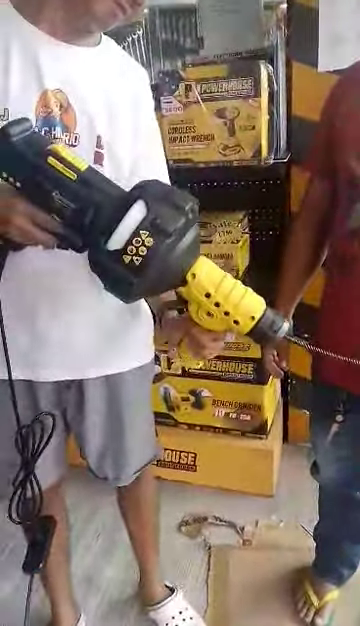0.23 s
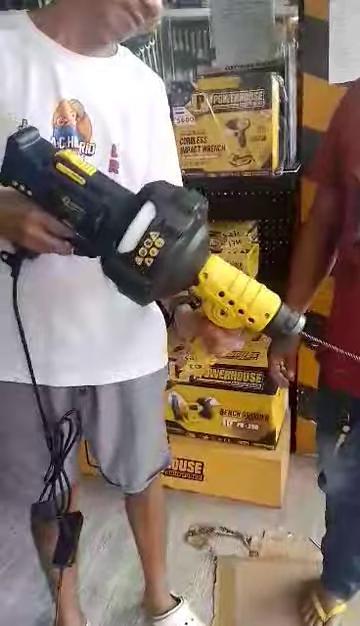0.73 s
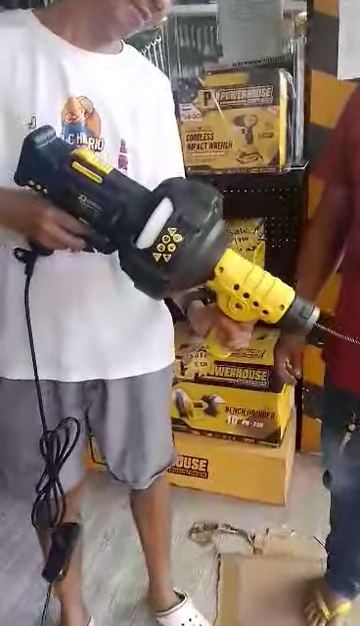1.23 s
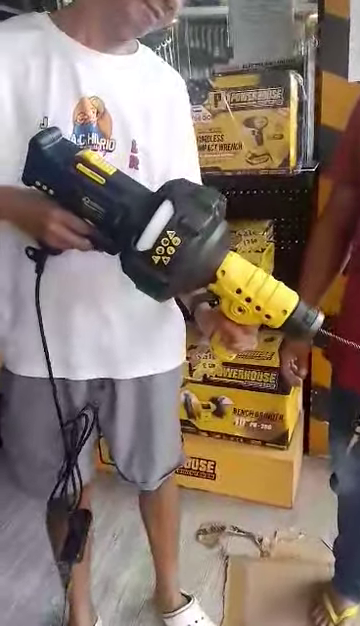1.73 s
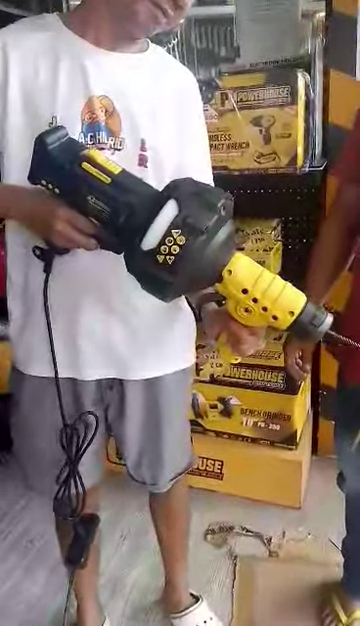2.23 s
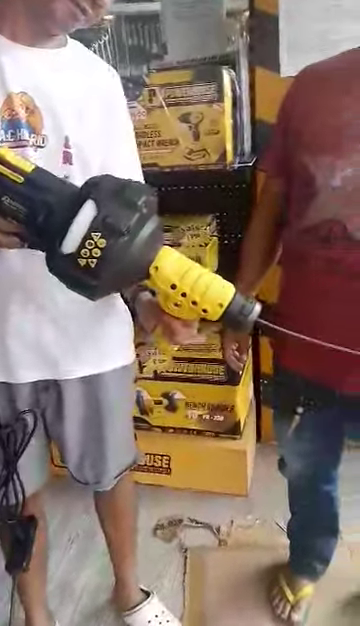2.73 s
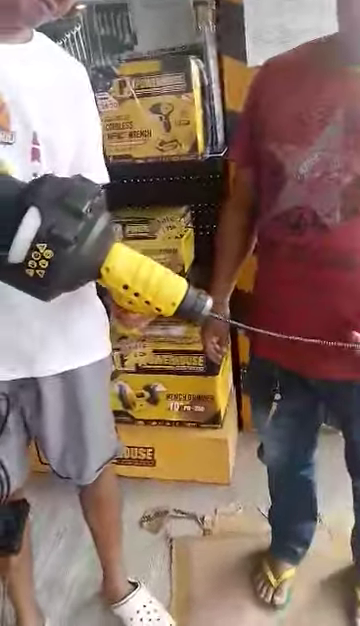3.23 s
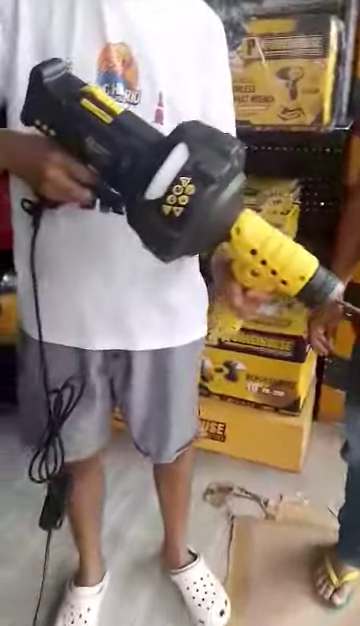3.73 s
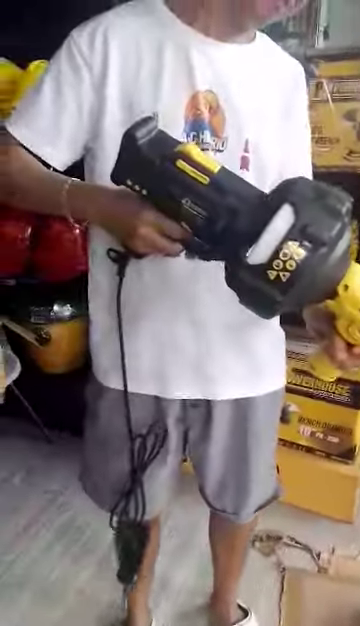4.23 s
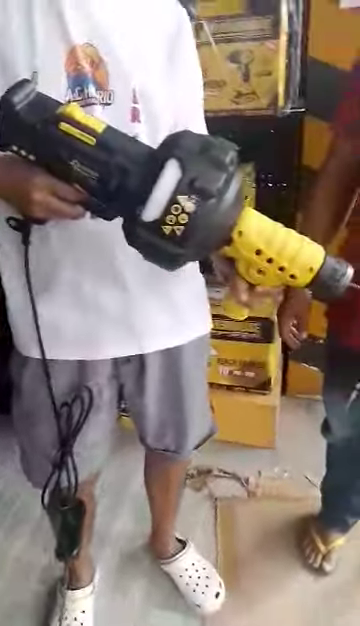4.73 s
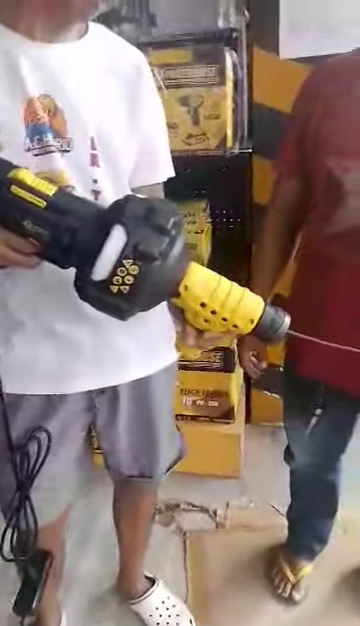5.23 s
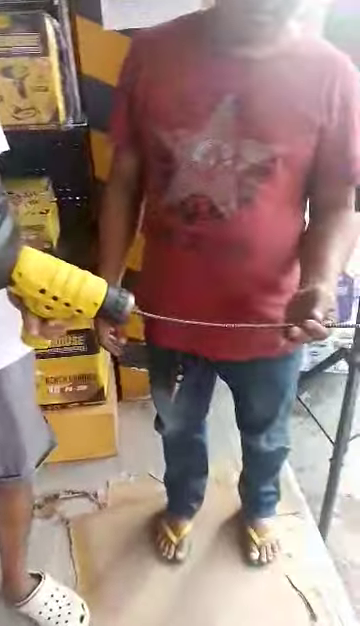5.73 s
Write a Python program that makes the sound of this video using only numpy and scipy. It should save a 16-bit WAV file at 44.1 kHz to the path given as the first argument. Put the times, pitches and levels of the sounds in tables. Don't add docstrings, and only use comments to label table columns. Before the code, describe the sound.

A hand-held electric motor tool whirs up to a high, hissing whine, coasts down briefly, then is switched on again while wind buffets the microphone.

```python
import sys
import numpy as np
from scipy import signal
from scipy.fft import rfft, irfft, dct, next_fast_len
from scipy.io import wavfile
from scipy.ndimage import uniform_filter1d

SR = 44100
rng = np.random.default_rng(int(sys.argv[2]) if len(sys.argv) > 2 else 0)


def dump(signal):
    limited = np.clip(np.atleast_2d(signal).T, -1, 1)
    pcm = np.round(limited * 32767).astype(np.int16)
    wavfile.write(sys.argv[1], SR, pcm)


def makeup_ratio(level_db):
    decades = np.asarray(level_db, float) / 20
    return 10 ** decades


N = 263629
TIME = np.arange(N) / SR

# (power on [s], power off [s], full torque from [s], crawl speed [Hz], top speed [Hz])
PULLS = [
    (.67, 2.57, .69, 20, 330),
    (3.40, 6.2, 3.495, 148, 332.6),
]
# (time [s], nearness [dB], cable drag [dB], aim left minus right [dB])
HANDS = [(.67, -3.5, 2.5, 10), (.79, 0.5, -3, -1.5), (.93, 1.5, -2.5, -4), (1.25, 2, -3, -2),
         (1.65, 1, -1.5, -2), (1.97, 0.5, -2, -0.5), (2.01, 0.5, -1.5, -3.5), (2.06, 0.5, -2, -1),
         (2.57, 1, -2.5, -1.5), (3.12, -4, -4, 1), (3.6, 1.5, -3, -0.5), (3.95, 2, -1, -1),
         (4.01, 1, -4.5, -3), (4.08, 1, -1, -2), (4.56, 1, 1, -2.5), (5.07, 0.5, -1.5, 0),
         (5.62, 1.4, -3, -1.5), (5.98, 1.8, 0, -2.5)]


def evened(x):
    return x / np.sqrt(np.mean(x ** 2, -1, keepdims=True) + 1e-20)


def along(rows):
    s, *columns = np.transpose(rows)
    return np.array([np.interp(TIME, s, c) for c in columns])


def across(rows, hz):
    f, *columns = np.transpose(rows)
    return np.array([np.interp(np.log(hz + 1), np.log(f), c) for c in columns])


def coloured(x, rows, lift_db=0.):
    size = next_fast_len(N)
    gain = makeup_ratio(across(rows, np.fft.rfftfreq(size, 1 / SR)) + lift_db)
    return irfft(rfft(x, size) * gain, size)[:, :N]


def drift(hz):
    r = np.exp(-2 * np.pi * hz * 8 / SR)
    coarse = signal.lfilter([1], np.convolve([1, -r], [1, -r]), rng.standard_normal(N // 8 + 2))
    return np.interp(TIME * SR / 8, np.arange(len(coarse)), evened(coarse)).astype(np.float32)


def whine(turns, multiple, width_hz, steady=.3):
    angle = (2 * np.pi * ((multiple * turns + rng.random()) % 1)).astype(np.float32)
    in_phase = steady * np.sqrt(2) + drift(width_hz)
    return in_phase * np.cos(angle) + drift(width_hz) * np.sin(angle)


def street():
    # (frequency [Hz], left [dB], right [dB])
    street_colour = [(55, -74, -63.5), (114, -60, -45), (168, -48.5, -51), (222, -58, -50.5),
                     (587, -44, -51), (840, -73.5, -74), (1150, -70.5, -68), (1520, -74.5, -75),
                     (2380, -79, -72), (3200, -78.5, -76), (5750, -80.5, -82), (7700, -72, -90),
                     (10900, -91, -72.5), (12800, -92, -84)]
    noise = rng.standard_normal((2, N)) * makeup_ratio(1.2 * drift(5.7))
    quiet = [(f, l - 19 * (f < 800), r - 19 * (f < 800)) for f, l, r in street_colour]
    return coloured(noise, quiet, lift_db=31.5)


def gusts():
    # (start [s], length [s], left [dB], right [dB])
    gust_rows = [(0, 0.45, -36.5, -36), (0.726, 0.56, -48, -34), (1.006, 1.53, -45, -42.5),
                 (1.265, 0.12, -39, -32), (2.163, 0.39, -46, -30.5), (2.488, 0.53, -46, -40.5),
                 (3.087, 0.25, -60, -22.5), (3.23, 0.24, -34.5, -29.5), (3.561, 0.14, -36.5, -30.5),
                 (3.596, 0.57, -43.5, -45.5), (5.197, 0.33, -47.5, -55), (5.771, .3, -43, -22)]
    calm_db, rise_s, fall_s = -44, 0.028, 0.19
    energy = np.full((2, N), makeup_ratio(calm_db) ** 2)
    for s, length, *port_db in gust_rows:
        rise = (TIME - s) / rise_s + 1
        fall = 1 - (TIME - s - length) / fall_s
        shape = np.clip(np.minimum(rise, fall), 0, 1)
        energy += (shape ** 2 * makeup_ratio(port_db)[:, None]) ** 2
    return 10 * np.log10(energy)


def eddies(rush_db):
    per_s, over_rush_db, eddy_hz = 22., 11, 333
    when, size, pitch = rng.random((200, 3)).T
    s = np.cumsum(-np.log(when + 1e-9)) / per_s
    db = np.minimum(np.interp(s, TIME, rush_db) + over_rush_db - 14 * size, -23)
    hz = eddy_hz * (.88 + .4 * pitch ** 3)
    return [row for row in zip(s, db, hz) if row[0] < N / SR]


def puffs(rows):
    out, t = np.zeros(N + 2000), np.arange(-500, 900) / SR
    for (s, db, hz), (phase, length, glide) in zip(rows, rng.random((len(rows), 3))):
        span = (0.0022 + 0.00081 * length) * np.where(t < 0, .8, 1.7)
        angle = 2 * np.pi * (hz * t * (1 + 25 * (glide - .5) * t) + phase)
        wave = np.cos(angle) * np.exp(-abs(t / span) ** 2.74)
        wave += .5 * np.cos(1.82 * angle) * np.exp(-abs(t) / 0.0016)
        wave += 0.098 * np.cos(.3 * angle) * np.exp(-(t / 0.0065) ** 2)
        start = round(s * SR)
        out[start:start + len(t)] += makeup_ratio(db + 2) * wave
    return out[500:N + 500]


def wind():
    # (frequency [Hz], level [dB])
    rush_colour = [(30, -36), (110, -1), (160, -19), (240, 4.5), (330, 3.5), (600, -4), (900, -15.5),
                   (1400, -25), (1800, -46)]
    # (time [s], peak level [dB], frequency [Hz])
    puffs_left = [(0.033, -26, 295), (0.127, -30, 305), (0.183, -32, 360), (0.231, -28, 550),
                  (0.289, -23.5, 350), (0.296, -28.5, 643), (0.38, -23.5, 387), (0.438, -29, 397),
                  (0.518, -32, 315), (1.133, -19, 355), (1.331, -22.5, 510), (1.418, -26, 298),
                  (2.125, -24.5, 292), (3.187, -21, 371), (3.233, -17.5, 431), (3.327, -29, 376),
                  (3.592, -21, 328), (3.658, -20.5, 286), (3.743, -23, 304), (3.805, -25, 319),
                  (4.101, -24, 716), (5.909, -22, 348)]
    puffs_right = [(0.074, -23.5, 388), (0.224, -27, 400), (0.338, -21.5, 340), (0.36, -19.5, 426),
                   (0.513, -24.5, 306), (0.743, -16.5, 293), (0.77, -15, 290), (0.846, -17, 340),
                   (1.001, -17, 303), (1.284, -22, 328), (2.173, -20.5, 325), (2.248, -15, 354),
                   (2.302, -17, 326.5), (2.515, -16, 310), (2.565, -19, 282), (3.09, -16, 400),
                   (3.105, -14.5, 412.6), (3.124, -12, 526), (3.183, -11, 325), (3.222, -15.5, 362),
                   (3.266, -11, 373), (3.291, -16, 322), (3.382, -27, 307), (3.582, -15.5, 317),
                   (3.622, -19, 284), (4.09, -26, 725), (5.77, -18.5, 279), (5.816, -17, 370),
                   (5.876, -15.5, 360), (5.915, -18, 370)]
    lump_db = [4 * drift(27) + 2.3 * drift(5), 4 * drift(34) + 2.2 * drift(6.1)]
    lumps = rng.standard_normal((2, N)) * makeup_ratio(lump_db)
    breeze_db = gusts()
    small = np.array([puffs(eddies(port_db)) for port_db in breeze_db])
    large = np.array([puffs(puffs_left), puffs(puffs_right)])
    breeze_db = breeze_db + 1.4 * np.minimum(breeze_db + 39.5, 0)
    rush = evened(coloured(lumps, rush_colour)) * makeup_ratio(breeze_db - 0.5)
    return rush + small + large


def edge_tones():
    # (time [s], length [s], frequency [Hz], level [dB])
    whistles = [
        (0.064, 0.16, 690, -55),
        (0.235, 0.14, 660, -45),
        (0.363, 0.098, 430, -37),
    ]
    mono = np.zeros(N)
    for s, length, hz, db in whistles:
        swell = np.clip(np.minimum(TIME - s, s + length - TIME) / 0.011, 0, 1)
        mono += makeup_ratio(db) * swell * whine(TIME, hz, 26)
    return mono * makeup_ratio([[0], [-9]])


def trigger():
    on = np.clip(np.minimum(TIME - .575, .69 - TIME) / 0.016, 0, 1)
    song = makeup_ratio(-43.5) * whine(TIME, 7560, 250) + makeup_ratio(-51) * whine(TIME, 9000, 150)
    return on * song * makeup_ratio([[0], [-8]])


def rotor():
    # (time constant [s], shape of the approach [exponent])
    spin_up = [
        (.19, .73),
        (.3, 1),
    ]
    coast_s, engage_s, release_s = 0.99, 0.15, 0.054
    speed, power = np.zeros(N), np.zeros(N)
    for (on, off, torque, crawl_hz, top_hz), (lag, shape) in zip(PULLS, spin_up):
        since = np.maximum(np.minimum(TIME, off) - torque, 0)
        driven = top_hz - (top_hz - crawl_hz) * np.exp(-(since / lag) ** shape)
        coast = np.exp(-np.maximum(TIME - off, 0) / coast_s)
        speed = np.maximum(speed, driven * coast * (TIME > on))
        power += np.clip(np.minimum((TIME - on) / engage_s, 1 - (TIME - off) / release_s), 0, 1)
    return speed + 1, power


def shaft_tones(turns, share, power, pull):
    # (multiple of shaft [ratio], level over hiss [dB], width [Hz])
    mesh = [(3.715, -23.5, 330), (7.594, -18, 79), (11.43, -14.5, 140), (14.98, -12.5, 80),
            (18.75, -17, 240), (22.18, -16, 70), (25.73, -23, 270), (29.54, -18, 140), (32.83, -22.5, 220),
            (37.07, -16.5, 200)]
    slots_and_blades = [(2.557, -24.5, 17), (7.66, -20.5, 43), (11.716, -18.5, 46), (17.72, -17, 24),
                        (35.84, -24.5, 70), (38, -23, 72)]
    winding_slots = [(23.85, -17.5, 30), (25.0, -22.5, 51)]
    free = 1 - power
    slack = np.maximum(TIME - 3.9, 0)

    def wavering(orders):
        return sum(makeup_ratio(db) * (1 + .3 * drift(7.)) * whine(turns, k, w) for k, db, w in orders)

    tooth_db = -3.5 + 13.5 * pull - 6 * free - slack
    unbalance_db = 1 + 37 * np.log10(share) + 8.5 * free
    tones = makeup_ratio(tooth_db) * wavering(mesh)
    tones += makeup_ratio(-slack) * wavering(slots_and_blades)
    slot_song = sum(makeup_ratio(db) * whine(turns, k, w) for k, db, w in winding_slots)
    tones += power * makeup_ratio(-2 * slack) * slot_song
    tones += makeup_ratio(unbalance_db - 24.5) * whine(turns, 0.99, 1.25, steady=2.4)
    return tones


def casing(hz):
    # (frequency [Hz], width [Hz], level [dB])
    resonances = [(1267, 60, 7.5), (1629, 133, -4), (2150, 140, 3.5), (2370, 91, 5), (3078, 500, -6),
                  (3954, 540, -2.5), (5150, 150, -1.5), (6245, 300, -2)]
    return sum(db * np.exp(-((hz - f) / w) ** 2) for f, w, db in resonances)


def motor():
    # (frequency [Hz], left [dB], right [dB])
    running_colour = [(55, -97, -91), (110, -67, -73), (160, -67, -70), (233, -60, -59), (674, -54.5, -61),
                      (943, -58.5, -52.5), (1197, -56, -56), (1552, -58, -54.5), (2106, -50, -51),
                      (3022, -47, -50), (5390, -44.5, -45.5), (7644, -34.5, -46.5), (10370, -43, -37),
                      (13810, -46.5, -48)]
    # (frequency [Hz], likeness [0-1])
    likeness = [(100, 0.8), (350, 1), (700, 0), (2200, 0.56), (5000, 0.12), (9000, 0), (13000, 0.1)]
    speed, power = rotor()
    turns, share, free = np.cumsum(speed) / SR, speed / speed.max(), 1 - power
    pull = np.minimum(2 * power, 1) * np.minimum(1 - share, .55)
    tones = shaft_tones(turns, share, power, pull)

    common, left, right = rng.standard_normal((3, N)) * makeup_ratio(1.3 * drift(850))
    hz, s, z = signal.stft(np.array([common, left, right, tones]), SR, nperseg=512)
    hz = hz[:, None]
    at = np.minimum((s * SR).astype(int), N - 1)

    strain_db, strain_hz, strain_width_hz = 20., 2650., 800.
    z[3] *= makeup_ratio(strain_db * np.exp(-((hz - strain_hz) / strain_width_hz) ** 2) * pull[at])

    same = np.clip(across(likeness, hz[:, 0])[0], 0, 1)[:, None]
    late = np.exp(-2j * np.pi * hz * 7 / SR)
    own = np.sqrt(1 - same)
    shared = np.sqrt(same) * z[0] + z[3]
    z = np.array([late * shared + own * z[1], shared + own * z[2]])

    near_db, rumble_db, pan_db = along(HANDS)[:, at]
    idle_db = np.maximum(-2 + 15 * np.log10(share), -28)
    hiss_db = near_db + (free * idle_db)[at]
    mid_pan_db = -0.75 - 6 * free[at] * share[at]
    low = 1 / (1 + (hz / 3800) ** 4)
    side_db = (low * mid_pan_db + (1 - low) * pan_db) / 2
    patches = rng.standard_normal(z.shape)
    patches = evened(uniform_filter1d(uniform_filter1d(patches, 8, 1), 9, 2))
    air_db = 1.0 * (hz > 11000) * drift(7.1)[at]
    tone_db = hiss_db + low * rumble_db + casing(hz) + 1.6 * patches + air_db
    z *= makeup_ratio(tone_db + np.array([side_db, -side_db]))
    sound = signal.istft(z, SR, nperseg=512)[1][:, :N]

    shake = drift(21)
    shake -= uniform_filter1d(shake, size=8000)
    throb_db = 0.74 * np.cos(2 * np.pi * turns / 15) + 1.1 * shake
    switch = np.clip((TIME - .665) / 0.027, 0, 1)
    return coloured(sound * makeup_ratio(throb_db) * switch, running_colour, lift_db=29.5)


def scene():
    return street() + wind() + edge_tones() + trigger() + motor()


def thinned(x):
    # (frequency [Hz], level [dB])
    thresholds = [(500, -44), (1300, -25), (1600, -18), (2200, -18), (2800, -10), (3400, -9), (4200, -7.5),
                  (5400, -4), (6500, -7), (9000, -16), (11700, -5), (13000, -6.5)]
    hop, lead = 1024, 800
    window = np.sin(np.pi * (np.arange(2 * hop) + .5) / 2 / hop)
    padded = np.pad(x, ((0, 0), (lead + hop, 3 * hop - (N + lead) % hop)))
    blocks = padded.reshape(2, -1, hop)
    pairs = np.concatenate([blocks[:, :-1], blocks[:, 1:]], axis=2) * window
    a, b, c, d = np.split(pairs, 4, axis=2)
    folded = np.concatenate([-c[..., ::-1] - d, a - b[..., ::-1]], axis=2)
    lines = dct(folded, type=4, norm="ortho")

    hz = (np.arange(hop) + .5) * SR / 2 / hop
    s = (np.arange(lines.shape[1]) * hop - lead) / SR
    treble = lines[..., (hz > 6500) & (hz < 12000)]
    treble_db = 10 * np.log10((treble ** 2).mean((0, 2)) + 1e-14)
    jumps = evened(uniform_filter1d(rng.standard_normal((64, len(s))), size=3, axis=1))
    jumps_db = 4.0 * np.repeat(jumps, 16, axis=0)
    drag_db = np.interp(s, TIME, along(HANDS)[1])
    coarse_db = np.where(s < PULLS[0][0], -2.5, 2.5 - .6 * drag_db)
    step_db = treble_db + coarse_db + jumps_db + across(thresholds, hz)[0][:, None]
    step = makeup_ratio(step_db).T / .6
    rounded = np.sign(lines) * np.floor(abs(lines) / step + .4) * step

    u, v = np.split(dct(rounded, type=4, norm="ortho"), 2, axis=2)
    frames = np.concatenate([v, -v[..., ::-1], -u[..., ::-1], -u], axis=2) * window
    joined = frames[:, :-1, hop:] + frames[:, 1:, :hop]
    return joined.reshape(2, -1)[:, lead:N + lead]


def band_limit(x):
    return signal.sosfilt(signal.butter(12, 13930, fs=SR, output="sos"), x)


def record(dry):
    edge = signal.firwin(401, 13150, window=("kaiser", 9), fs=SR)[None]
    x = signal.oaconvolve(np.clip(dry, -1.05, 1.05), edge, "same")
    return band_limit(thinned(x))


dry = scene()
out = record(dry)
dump(out)
```